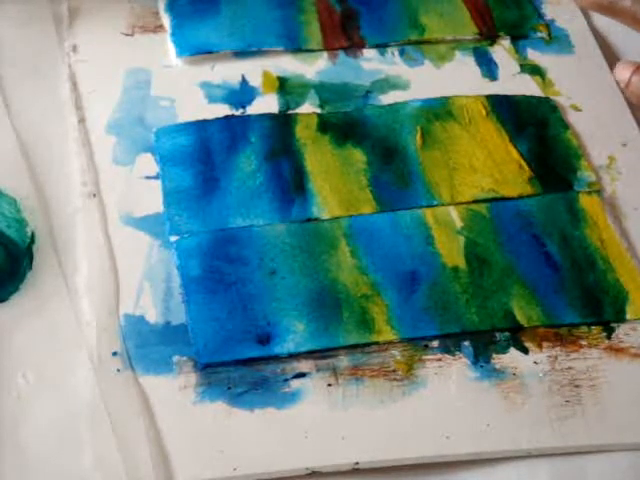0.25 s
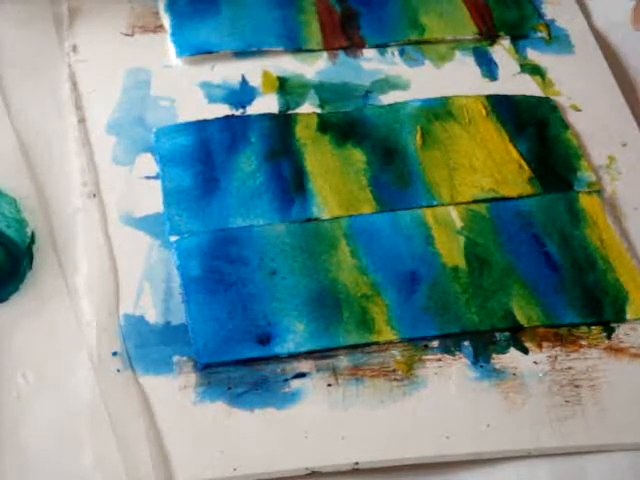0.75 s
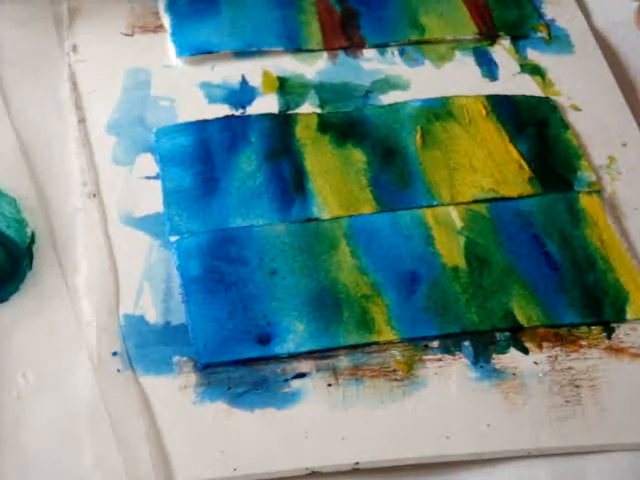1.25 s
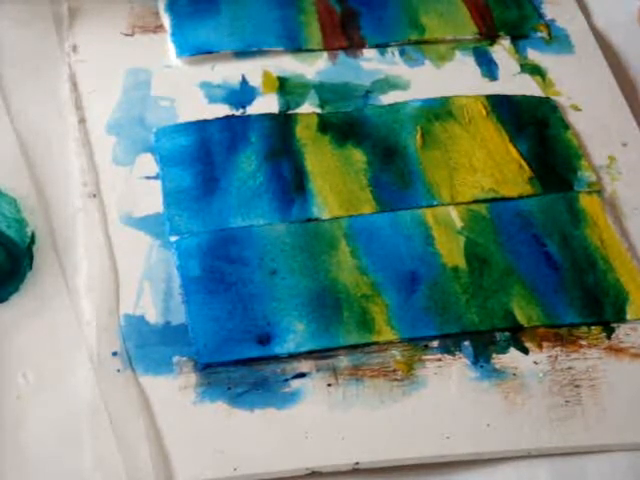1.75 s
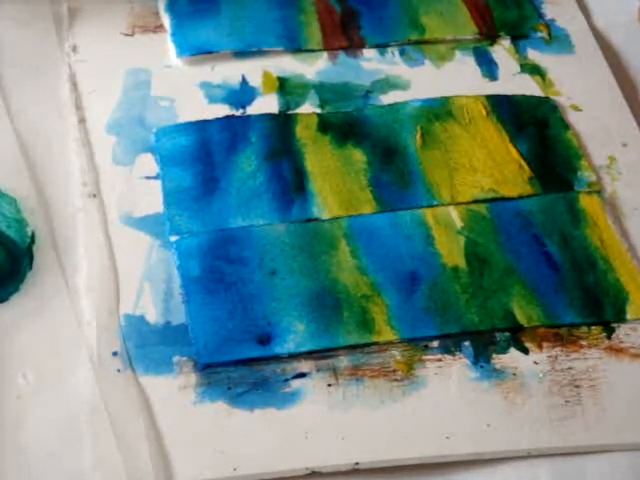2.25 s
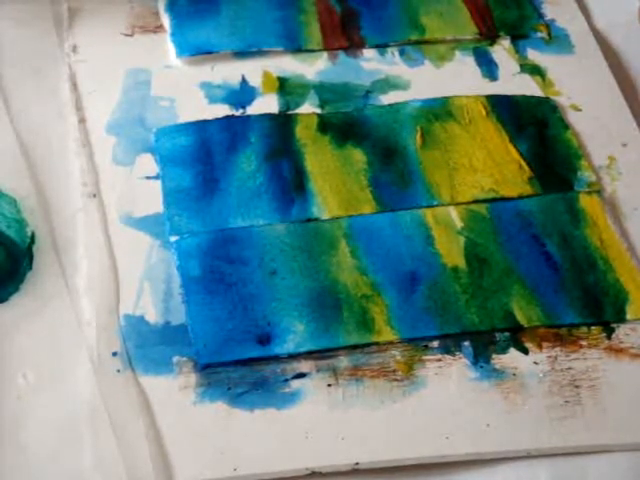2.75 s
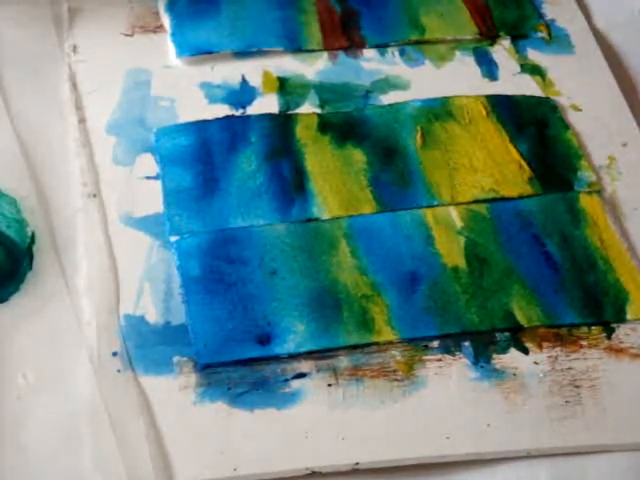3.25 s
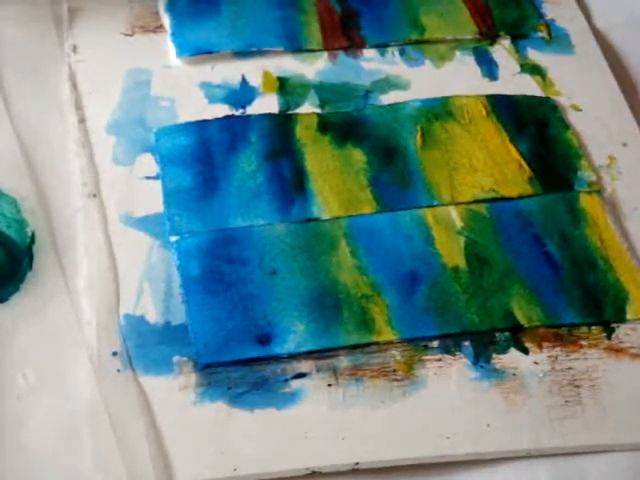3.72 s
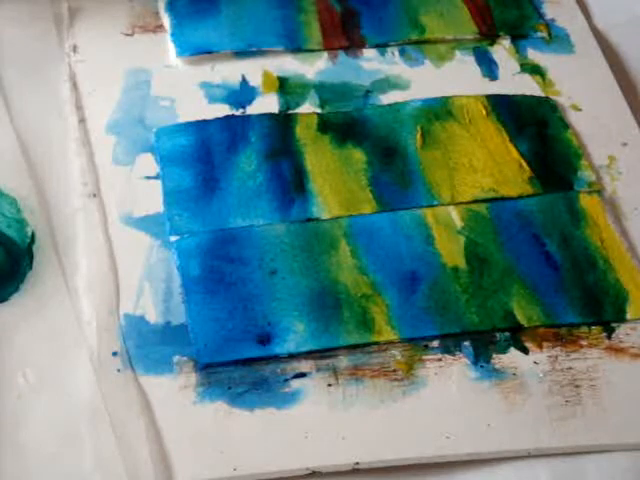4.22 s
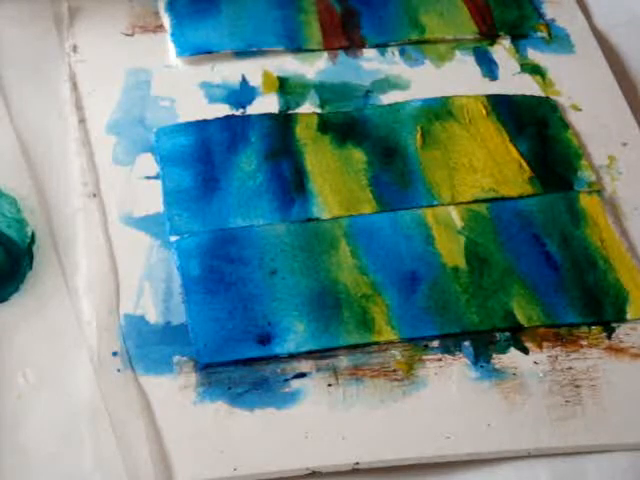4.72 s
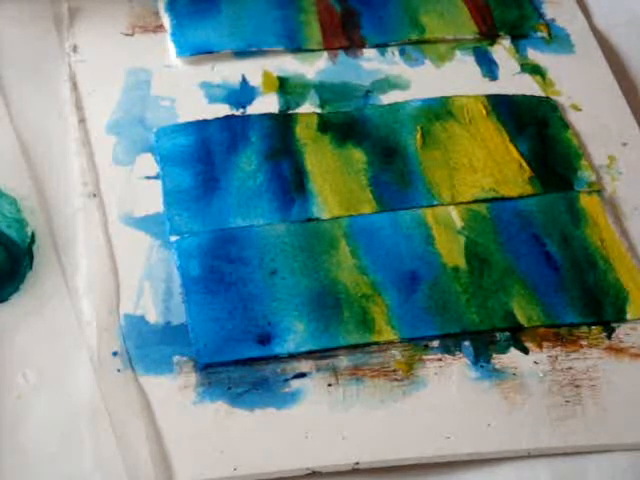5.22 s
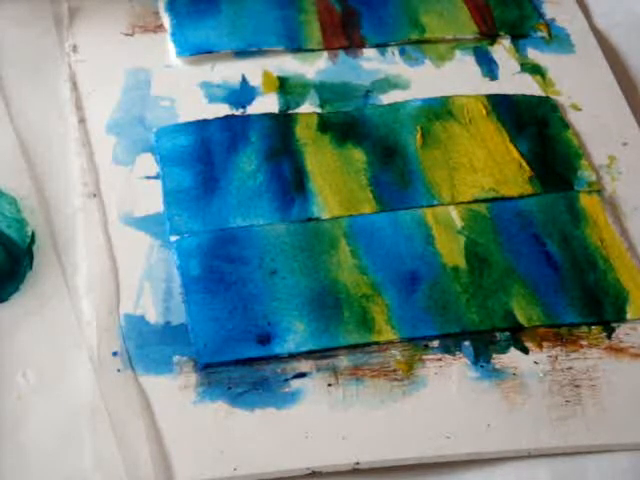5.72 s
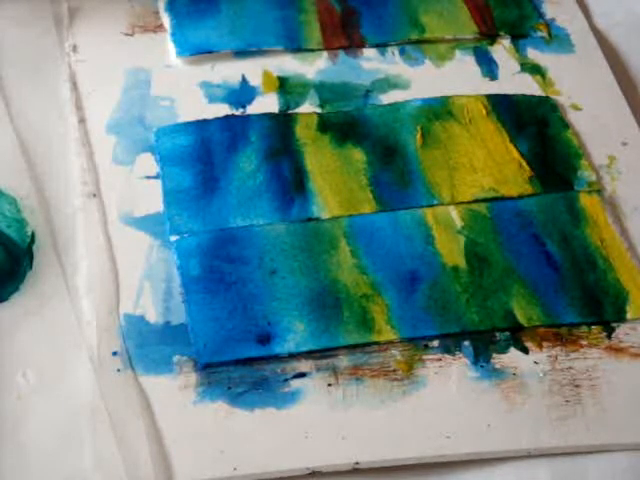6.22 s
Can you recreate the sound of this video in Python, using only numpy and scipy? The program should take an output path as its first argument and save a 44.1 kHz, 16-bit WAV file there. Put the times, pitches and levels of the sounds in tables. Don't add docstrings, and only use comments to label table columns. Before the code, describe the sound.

Close pickup with constant low hiss and short, lively room reverberation. Irregular short clinks on glass come first, followed by regular taps on a wooden table edge, about seven a second, mixed with wet handle rattle and a faint scrape. Light ticks on the rim fade away. After near silence, water stirs briefly with one bubble; later a sharp clack of the brush put down, then soft cloth scuffs.

```python
import sys
import numpy as np
from scipy import signal
from scipy.fft import rfft, irfft, next_fast_len
from scipy.io import wavfile
from scipy.ndimage import uniform_filter1d

SR = 44100
rng = np.random.default_rng(int(sys.argv[2]) if len(sys.argv) > 2 else 0)


def volts_from_db(level):
    exponent = np.asarray(level, float) / 20
    return 10 ** exponent


def pcm_store(signal):
    levels = np.round(np.clip(np.atleast_2d(signal), -1, 1) * 32767)
    wavfile.write(sys.argv[1], SR, levels.astype(np.int16).T)


N = 285282
TAIL_LENGTH = 16384
BLOW_LENGTH = TAIL_LENGTH // 4

# pitch_hz, strength_db, t60_s
TABLE_MODES = [(400, -7.5, 0.18), (478.4, -4.5, 0.14), (565, 6, 0.11), (640, -2.5, 0.054), (753, 4, 0.034)]
# pitch_hz, strength_db, t60_s
THUD_MODES = [(130.6, -0.5, 0.33), (330, 4, 0.39)]
# pitch_hz, strength_db, t60_s
FERRULE_MODES = [(3160, 15.5, 0.0068), (3690, 17.5, 0.0046), (3830, 4.5, 0.0058), (4290, 13.5, 0.005),
                 (4910, 14.5, 0.0033), (4840, -37, 0.01), (6020, 5.5, 0.0048)]


def unit(x):
    return x / np.sqrt(np.mean(x ** 2) + 1e-20)


def along(points, hz):
    f, v = np.transpose(points)
    return np.interp(np.log(hz + 1), np.log(f + 1), v)


def filtered(x, spectrum):
    size = next_fast_len(N + 8192)
    gain = volts_from_db(along(spectrum, np.fft.rfftfreq(size, 1 / SR)))
    return irfft(rfft(x, size) * gain, size)[:N]


def coloured(x, spectrum):
    return unit(filtered(x, spectrum))


def grainy(depth_db, size):
    flutter = unit(uniform_filter1d(rng.standard_normal(N), size))
    return rng.standard_normal(N) * volts_from_db(depth_db * flutter)


def strokes(rows):
    t = np.arange(N) / SR
    gain = np.zeros(N)
    for peak_s, peak_db, rise_s, fall_s in rows:
        distance = np.where(t < peak_s, (peak_s - t) / rise_s, (t - peak_s) / fall_s)
        gain += volts_from_db(peak_db - 15.5 * distance ** 0.73)
    return gain


def ring(hz, db, t60, attack):
    t = np.arange(BLOW_LENGTH) / SR
    hz, db, t60 = (np.reshape(v, (-1, 1)) for v in (hz, db, t60))
    return volts_from_db(db - 60 * t / t60) * np.sin(2 * np.pi * hz * t) * (1 - np.exp(-t / attack))


def struck(modes, db, scatter_db, attack):
    hz, strength_db, t60 = np.transpose(modes)
    chance = rng.standard_normal((3, len(modes)))
    shifted_hz = hz * (1 + 0.0082 * chance[0])
    sines = ring(shifted_hz, db + strength_db + scatter_db * chance[1], t60, attack)
    return np.sign(chance[2]) @ sines


def joint_blows(parts, scatter_db, attack):
    return sum(volts_from_db(share_db)[:, None] * struck(modes, 0, scatter_db, attack) for modes, share_db in parts)


def cracks(db, hz, t60, size=9):
    t = np.arange(BLOW_LENGTH) / SR
    noise = uniform_filter1d(rng.standard_normal((2, len(db), len(t))), size=size, axis=2)
    noise = uniform_filter1d(noise, size=size // 2, axis=2) * (1 - np.exp(-t / 0.0003))
    turn = 2 * np.pi * np.reshape(hz, (-1, 1)) * t
    carried = noise[0] * np.cos(turn) + noise[1] * np.sin(turn)
    return carried * volts_from_db(np.reshape(db, (-1, 1)) - 60 * t / t60)


def in_room(starts, sounds, wet_db, wall_db, blur, alike=0):
    # pitch_hz, t60_s
    room_decay = [(150, 0.53), (500, 0.59), (1200, 0.59), (3000, 0.39), (6000, 0.35), (10000, 0.048)]
    # delay_s, level_db
    wall_echoes = [(.0045, -9), (.0105, -7), (.018, -17.5), (.031, -6.5)]
    lead = 200
    count = len(starts)
    age = np.arange(TAIL_LENGTH) / SR

    hz, t, z = signal.stft(rng.standard_normal((count, TAIL_LENGTH)), SR, nperseg=256)
    even = z / np.sqrt(np.abs(z))
    decaying = even * volts_from_db(-60 * t / along(room_decay, hz)[:, None])
    tails = signal.istft(decaying, SR, nperseg=256)[1][:, :TAIL_LENGTH]
    tails = alike * tails[0] + np.sqrt(1 - alike ** 2) * tails
    tails = tails * (1 + volts_from_db(-6.0 - 60 * age / 0.062)) * (1 - np.exp(-age / 0.00053))
    tails = volts_from_db(wet_db) * tails / np.linalg.norm(tails, axis=1, keepdims=True)

    near = np.zeros_like(tails)
    near[:, 0] = 1
    for delay_s, level_db in wall_echoes:
        near[:, round(delay_s * SR)] = volts_from_db(level_db + wall_db)
    smear = rng.standard_normal((count, lead)) * volts_from_db(np.linspace(-52, -34, lead))

    blunt = sounds * volts_from_db(-60 * age[:sounds.shape[1]] / blur)
    size_before = np.linalg.norm(sounds, axis=1, keepdims=True)
    blunt = blunt * size_before / np.linalg.norm(blunt, axis=1, keepdims=True)
    heard = signal.fftconvolve(sounds, np.hstack([smear, near]), axes=1)
    heard = heard + signal.fftconvolve(blunt, np.hstack([0 * smear, tails]), axes=1)

    out = np.zeros(N + heard.shape[1])
    for start_s, one in zip(starts, heard):
        out[round(start_s * SR) - lead:][:len(one)] += one
    return out[:N]


def camera_hiss():
    # pitch_hz, density_db
    hiss_spectrum = [(15, -22), (25, -23.5), (155, -6.5), (185, -4.5), (226, -2.5), (329, -1.5),
                     (517, -1.5), (918, -3.5), (1020, -4.5), (1760, -7.5), (2210, -9), (3130, -11),
                     (9900, -17), (12900, -122), (21800, -120)]
    return volts_from_db(-52) * coloured(rng.standard_normal(N), hiss_spectrum)


def sleeve():
    # peak_s, peak_db, rise_s, fall_s
    scuffs = [
        (4.776, -53, 0.057, .08),
        (5.724, -39, .035, 0.08),
        (6.078, -48.5, 0.053, 0.14),
        (6.336, -53.5, .03, 0.18),
    ]
    # pitch_hz, density_db
    cloth_spectrum = [(88, -49), (150, -18), (378, -0.5), (569, -11.5), (756, -6), (2820, -7), (9270, -15),
                      (10500, -42), (13600, -69), (22000, -120)]
    return strokes(scuffs) * coloured(grainy(3.0, 60), cloth_spectrum)


def slosh():
    # peak_s, peak_db, rise_s, fall_s
    surges = [
        (3.4, -47.5, 0.049, 0.092),
    ]
    # pitch_hz, density_db
    water_spectrum = [(100, -20), (200, 18.5), (400, 14), (800, 13), (1600, -50)]
    return strokes(surges) * coloured(rng.standard_normal(N), water_spectrum)


def bubbles():
    # start_s, length_s, first_hz, last_hz, level_db
    air_pockets = [
        (3.552, 0.0462, 640, 1197, -22),
    ]
    t = np.arange(BLOW_LENGTH) / SR
    starts, sounds = [], []
    for start_s, length_s, first_hz, last_hz, level_db in air_pockets:
        progress = np.clip(t / length_s, 0, 1)
        pitch_hz = first_hz * (last_hz / first_hz) ** progress
        turn = 2 * np.pi * np.cumsum(pitch_hz) / SR
        fade_in = np.clip(t / 0.00076, 0, 1)
        burst = np.clip((length_s - t) / 0.0013, 0, 1)
        swell = volts_from_db(level_db - 4.7 * (5 - progress)) * fade_in * burst
        flutter = volts_from_db(0.75 * unit(uniform_filter1d(rng.standard_normal(len(t)), size=150)))
        starts.append(start_s)
        sounds.append(swell * flutter * np.sin(turn))
    return in_room(starts, np.array(sounds), wet_db=-15, wall_db=-1, blur=0.55)


def scrape():
    # peak_s, peak_db, rise_s, fall_s
    slides = [
        (0.94, -43.5, 0.076, 0.27),
        (2.13, -50, 0.1, 0.63),
    ]
    # pitch_hz, density_db
    slide_spectrum = [(500, -30), (1100, 4), (1500, -3), (2500, -1), (3200, -7), (4500, -18), (6500, -32)]
    return strokes(slides) * coloured(grainy(4.8, 120), slide_spectrum)


def bristle_clicks():
    # start_s, peak_db, centre_hz
    clicks = [(0.2436, -30.5, 8660), (2.2417, -36.5, 7070), (2.3826, -44, 8300), (3.5226, -41, 8730),
              (3.844, -44, 6040), (4.0685, -48, 8350), (4.7125, -43, 10000)]
    start_s, peak_db, centre_hz = np.transpose(clicks)
    sounds = cracks(peak_db + 15, centre_hz, t60=0.006, size=16)
    return in_room(start_s, sounds, wet_db=-1, wall_db=-8, blur=0.024)


def jar_touches():
    # start_s, peak_db, pitch_hz, t60_s
    nudges = [(0.746, -30, 1160, 0.022), (0.905, -34, 955, 0.033), (0.927, -25, 1120, 0.019),
              (1.27, -30, 1120, 0.025), (2.122, -26.5, 1170, 0.0082), (2.306, -35.5, 1160, 0.016),
              (2.4, -42, 970, 0.029), (3.557, -33, 1170, 0.022), (3.841, -34.5, 1213, 0.022)]
    # start_s, peak_db, pitch_hz, t60_s
    foot_bumps = [
        (0.456, -37, 342, 0.053),
        (3.547, -40, 718, 0.05),
        (3.684, -51, 368, 0.077),
    ]
    start_s, peak_db, pitch_hz, t60_s = np.transpose(np.concatenate([nudges, foot_bumps]))
    sounds = ring(pitch_hz, peak_db + 2.0, t60_s, attack=0.002)
    return in_room(start_s, sounds, wet_db=-5, wall_db=4.0, blur=0.029)


def rim_touches():
    # start_s, peak_db, main_hz, second_hz
    rattle = [(0.807, -29, 3230, 2800), (0.8855, -43, 1760, 2900), (0.9003, -29.5, 3930, 4230),
              (0.915, -31.5, 2100, 1520), (0.9248, -20.5, 4100, 3500), (0.964, -45, 2960, 2960),
              (0.9736, -49, 2280, 3000), (0.985, -34, 2270, 3740), (1.0033, -32.5, 1900, 2950),
              (1.0103, -34.5, 1640, 3110), (1.272, -32.5, 2140, 3080), (1.3517, -32, 2120, 3280),
              (1.358, -37, 2060, 3037), (1.4139, -33.5, 2350, 3080), (1.4645, -40, 2320, 2900)]
    # start_s, peak_db, main_hz, second_hz
    wipe = [(2.0655, -32, 4200, 2800), (2.0919, -36.5, 2600, 4230), (2.0925, -37, 2950, 3600),
            (2.104, -41, 3800, 2500), (2.15, -41.5, 1820, 4370), (2.1581, -37, 3020, 3100),
            (2.18, -47, 3000, 3020), (2.261, -40.5, 2480, 2960), (2.3669, -32, 3030, 3750),
            (2.5551, -44, 2350, 3240), (2.6923, -42, 2550, 1930), (2.747, -41, 4270, 4500)]
    # start_s, peak_db, main_hz, second_hz
    stir = [(3.501, -32, 2475, 2780), (3.5798, -47, 4360, 1870), (3.682, -48.5, 1480, 3020),
            (3.7063, -39.5, 2520, 1720), (3.712, -44.5, 3220, 3780), (3.7322, -42, 1625, 2050),
            (3.8398, -44, 2050, 1570), (3.8415, -48, 3470, 5700), (3.8816, -49, 1960, 3000),
            (4.7612, -52, 3170, 2060), (4.785, -50, 3840, 2550), (5.2774, -42, 2430, 3520),
            (5.722, -42, 1820, 1260), (6.0699, -59, 1700, 3260), (6.107, -52, 3200, 2800),
            (6.289, -52, 1800, 4030)]
    rim_t60 = [0.018, 0.013, 0.03]
    start_s, peak_db, main_hz, second_hz = np.transpose(np.concatenate([rattle, wipe, stir]))
    base_t60 = np.repeat(rim_t60, [len(rattle), len(wipe), len(stir)])

    def mode(hz, mode_db):
        return ring(hz, mode_db, base_t60 * (hz / 2500) ** -0.88, attack=0.0011)

    rim = mode(main_hz, peak_db + 6.5) + mode(second_hz, peak_db + 2.5)
    rim = rim - mode(0.78 * main_hz, peak_db - 3) - mode(0.7 * second_hz, peak_db - 17.5)
    rim = rim + cracks(peak_db + 4, main_hz, t60=0.009, size=24)
    return in_room(start_s, rim, wet_db=-6, wall_db=-9, blur=0.012)


def laid_down():
    # start_s, peak_db, crack_db (relative)
    drops = [
        (5.2162, -15, -30),
    ]
    # pitch_hz, strength_db, t60_s
    brush_modes = [(322, -9.5, 0.17), (554, -11, 0.15), (970, -3.5, 0.022), (1170, 1, 0.027),
                   (1560, -1, 0.019), (1730, -17, 0.008), (2140, 0.5, 0.019), (2550, 1.5, 0.021),
                   (3110, 0, .01), (3520, 0.5, 0.014), (4100, 3.5, 0.0083), (4750, -9, 0.0071)]
    start_s, peak_db, crack_db = np.transpose(drops)
    blow = struck(brush_modes, peak_db - 10.0, scatter_db=1.6, attack=0.00059)
    blow = blow + cracks(peak_db + crack_db + 1, hz=6670, t60=0.01)
    blow = blow + cracks(peak_db + 4, hz=3600, t60=0.0035, size=6)
    return in_room(start_s, blow, wet_db=-7.0, wall_db=-6.5, blur=0.016)


def taps():
    # start_s, table_db, edge_db, handle_db (last two relative)
    tap_events = [(0.94, -29.5, 5.5, -5), (1.078, -24.5, 3.5, -5.5), (1.221, -29, -7, -8),
                  (1.366, -29, 0.5, -11), (1.512, -28.5, 1, -11), (1.657, -28.5, -1, -7.5),
                  (1.809, -30, 0, -14)]
    # pitch_hz, strength_db, t60_s
    edge_modes = [(988, -1.5, 0.035), (1027, -1, 0.03), (1106, 2.5, 0.035), (1166, 0, 0.037),
                  (1374, 2, 0.0075)]
    # pitch_hz, strength_db, t60_s
    shaft_modes = [(1600, 10, 0.011), (1900, 9.5, 0.012), (2071, 4.5, 0.023), (2350, 2.5, 0.027),
                   (2800, 12.5, 0.0041)]
    start_s, table_db, edge_db, handle_db = np.transpose(tap_events)
    ferrule_db = -4.5 - 3.5 * np.arange(len(start_s))
    parts = (
        (TABLE_MODES, table_db - 8.5),
        (THUD_MODES, table_db - 19.5),
        (edge_modes, table_db + edge_db - 3.5),
        (shaft_modes, table_db + handle_db - 3.5),
        (FERRULE_MODES, table_db + ferrule_db),
    )
    blows = joint_blows(parts, scatter_db=0.4, attack=0.00068)
    return in_room(start_s, blows, wet_db=-6, wall_db=-3.5, blur=0.066, alike=0.6)


def knocks():
    # start_s, handle_db, table_db, jar_db, crack_db (last three relative)
    knock_events = [(0.2333, -28, -13, -5, -25), (0.398, -23, -12.5, -3, -5), (0.4665, -34, -13, -13, -4.5),
                    (0.5542, -32, -10, -1.5, -9), (0.607, -24, -19, -5.5, -10.5),
                    (0.9513, -29.5, -15, -3, -5.5)]
    # pitch_hz, strength_db, t60_s
    handle_modes = [(1690, -14, 0.054), (1790, -2.5, 0.023), (2220, -0.5, 0.026), (2420, 17, 0.0067),
                    (2600, -1, 0.014), (2960, 6, 0.019)]
    # pitch_hz, strength_db, t60_s
    jar_modes = [(970, -23, 0.0071), (1027, 2, 0.019), (1160, 10, 0.012), (1324, -29, 0.06)]
    start_s, handle_db, table_db, jar_db, crack_db = np.transpose(knock_events)
    parts = (
        (handle_modes, handle_db - 5),
        (TABLE_MODES, handle_db + table_db - 5),
        (THUD_MODES, handle_db + table_db - 32.0),
        (jar_modes, handle_db + jar_db),
        (FERRULE_MODES, handle_db - 3.5),
    )
    blows = joint_blows(parts, scatter_db=1.5, attack=0.00055)
    blows = blows + cracks(handle_db + crack_db + 9, hz=7000, t60=0.012)
    blows = blows + cracks(handle_db + 6, hz=4200, t60=0.008)
    return in_room(start_s, blows, wet_db=-4.5, wall_db=-6, blur=0.013)


def scene():
    # pitch_hz, gain_db
    microphone = [(20, -30), (80, -16), (120, 0), (20000, 0)]
    quiet = sleeve() + slosh() + bubbles() + scrape()
    contacts = bristle_clicks() + jar_touches() + rim_touches()
    blows = laid_down() + taps() + knocks()
    return (filtered(quiet + contacts + blows, microphone) + camera_hiss())[None]


def roll_off(x):
    return signal.sosfilt(signal.butter(12, 10940, fs=SR, output="sos"), x)


def record(dry):
    # pitch_hz, gain_db
    band_limit = [(20, 0), (10180, 0), (10300, -60)]
    # end_s, length_s, above_hz
    dropouts = [(.229, .009, 1600), (.392, .026, 2200), (.55, .005, 2600), (.58, .022, 7800),
                (.601, .021, 3300), (2.27, .023, 5600), (2.415, .025, 7000), (4.064, .014, 6500),
                (4.71, .02, 8500), (5.211, .022, 1300), (5.712, .017, 5500)]
    limited = filtered(dry[0], band_limit)[None]
    hz, t, z = signal.stft(limited, SR, nperseg=256, noverlap=192)
    for end_s, length_s, above_hz in dropouts:
        inside = (t > end_s - length_s) & (t < end_s)
        z[:, hz > above_hz] *= np.where(inside, volts_from_db(-20.0), 1)
    mix = signal.istft(z, SR, nperseg=256, noverlap=192)[1][:, :N]
    return roll_off(mix)


dry = scene()
out = record(dry)
pcm_store(out)
```